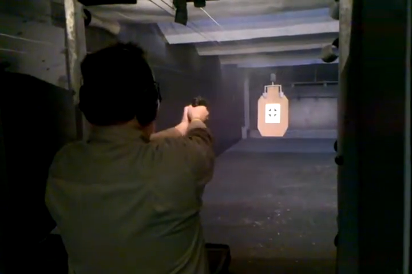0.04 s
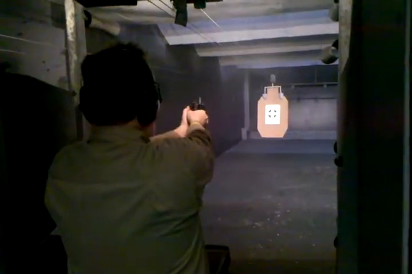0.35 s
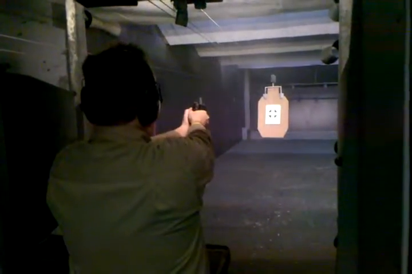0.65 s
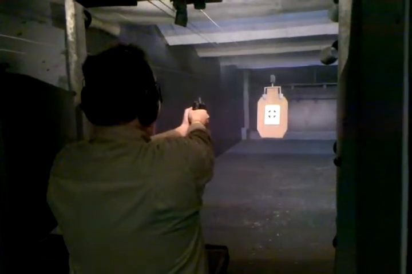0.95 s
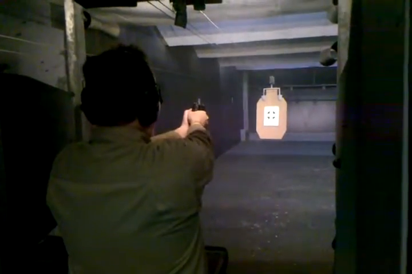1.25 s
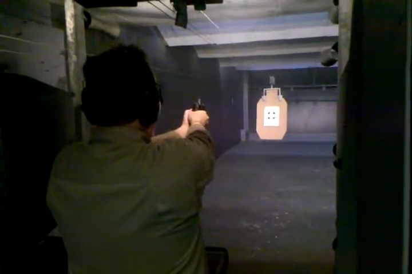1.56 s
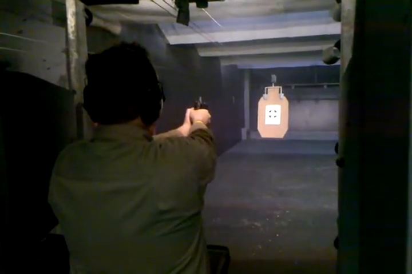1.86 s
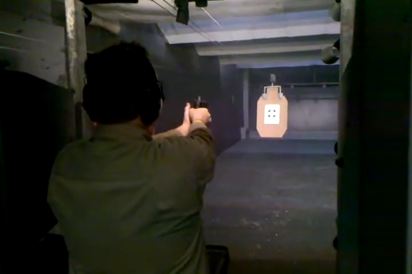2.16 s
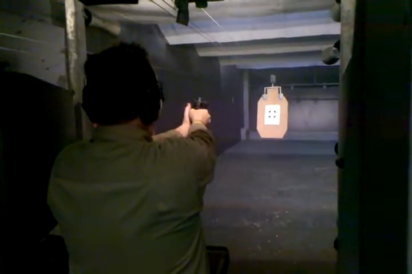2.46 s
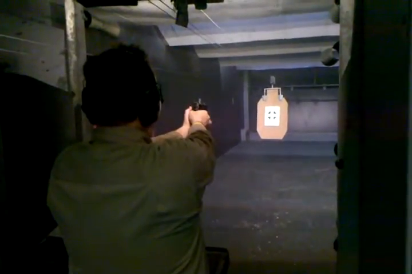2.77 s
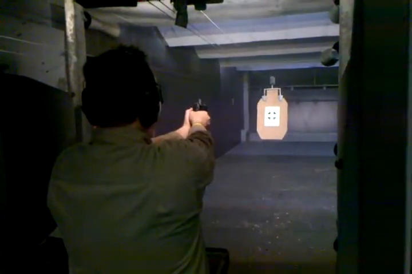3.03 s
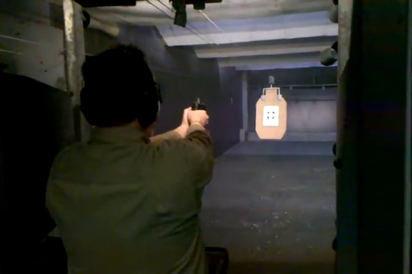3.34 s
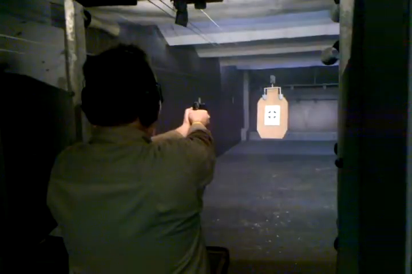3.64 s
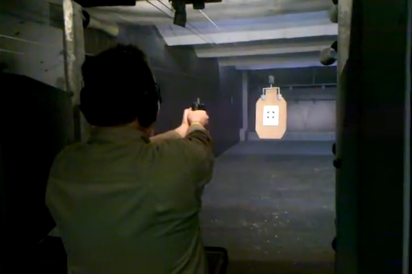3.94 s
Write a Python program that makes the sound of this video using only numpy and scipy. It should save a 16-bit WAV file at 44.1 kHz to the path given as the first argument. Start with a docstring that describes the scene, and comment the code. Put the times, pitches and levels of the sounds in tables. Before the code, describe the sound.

A single handgun blast rings out indoors, fading into faint casing pings and ventilation noise.

```python
"""One pistol shot in an indoor range, overloading a small camera microphone. The blast fills the concrete lane
and dies away in reflections, flutter echo and standing waves. The action clicks as the case is ejected; the
spent brass case bounces and pings. Ventilation hisses throughout. Two dry pops, the second faint, sound close
to the microphone as the echo fades."""
import sys
import numpy as np
from scipy import signal
from scipy.fft import rfft, irfft
from scipy.io import wavfile

SR = 44100
rng = np.random.default_rng(int(sys.argv[2]) if len(sys.argv) > 2 else 0)


def generate_wav(signal):
    """Clip the signal to [-1, 1] and save it as 16-bit WAV at the path in sys.argv[1]."""
    frames = np.transpose(np.atleast_2d(signal))
    scaled = np.clip(frames, -1, 1) * 32767
    pcm = np.round(scaled).astype(np.int16)
    wavfile.write(sys.argv[1], SR, pcm)


N = 176400
T = np.arange(N) / SR
HZ = np.fft.rfftfreq(N, 1 / SR)
PADDED_HZ = np.fft.rfftfreq(2 * N, 1 / SR)

# ventilation air: freq_hz, density_db
AIR_SPECTRUM = [(25, -108), (50, -98), (85, -80), (118, -68.5), (150, -67), (230, -70.5), (275, -71.5),
                (330, -67.5), (470, -73.5), (600, -73), (1100, -75), (1500, -77.5), (2000, -83),
                (2900, -89.5), (3900, -87), (5000, -93), (6700, -94.5)]
# duct resonances: pitch_hz, half_width_hz, rms_db
DUCT_MODES = [(117.6, 3.7, -52.5), (184.7, 6, -55), (232, 10, -48.5), (324.4, 6.3, -63), (514, 5.5, -57.5),
              (588.6, 2.3, -55), (612, 8.8, -57), (707.4, 8, -58), (784, 13, -57), (907, 8, -61),
              (996, 9.1, -58), (1152, 6.2, -60), (1468, 12, -59.5)]
# dry pops: start_s, level_db, rise_s, fall_s
DRY_POPS = [(1.2489, -10.5, .00002, 0.00081), (1.933, -30, .0002, 0.00024)]
# action click, then case bounces: start_s, level_db, bright_hz, spread_hz, room_t60_s
CLICKS_AND_BOUNCES = [(.314, -42, 7100, 2020, 0.26), (.597, -42.5, 5250, 1200, 0.4), (0.699, -55, 5400, 1000, 1),
                      (0.863, -50.5, 5430, 700, 0.4), (1.05, -53, 5150, 1000, .6), (1.14, -52, 4850, 1400, .8),
                      (1.166, -50, 4400, 1400, .8)]
# brass case modes: pitch_hz, gain_db, t60_s
BRASS_MODES = [(3900, -6, .2), (4600, -7, .25), (5066, 0.5, .22), (5432, -1.5, .26), (5750, -9.5, .25),
               (6600, -6.5, .15)]
# standing waves of the lane: pitch_hz, initial_rms_db, t60_s
LANE_MODES = [(221.1, -24.5, 1.02), (301, -19.5, 1.1), (324, -22.5, 0.89), (374.6, -17, 0.58),
              (699, -22.5, 2), (746, -20.5, 1.5), (777, -27, 2.9), (853, -25.5, 3.04), (877, -24, 1.1),
              (920, -31.5, 2.8), (920, -24, 1.5), (1017, -22.5, 1.1), (1151, -22.5, 0.51)]
# reverberation from far down the range: freq_hz, initial_density_db
FAR_SPECTRUM = [(100, -76), (300, -56.5), (480, -54.5), (650, -45), (850, -39.5), (1050, -46),
                (1270, -46.5), (1700, -56.5), (2050, -52.5), (2700, -68), (6000, -86.5)]
# blast in the lane: freq_hz, density_db
BLAST_SPECTRUM = [(30, -85), (85, -64), (130, -45.5), (230, -40.5), (320, -33), (430, -39), (570, -32),
                  (750, -32.5), (980, -31), (1300, -37), (1700, -42.5), (2100, -40.5), (2800, -51.5),
                  (3600, -52.5), (5000, -60.5), (6800, -68.5)]
# time that reflections hold the blast up: freq_hz, hold_s
BLAST_HOLD = [(150, 0.014), (400, 0.027), (800, 0.054), (2000, 0.015), (6000, .02)]
# blast decay: freq_hz, t60_s
BLAST_DECAY = [(60, 0.35), (130, 1.0), (300, 1.11), (800, 1.05), (2000, 1.064), (3500, 0.95), (6500, 0.41)]
# swells and dips as strong reflections return: time_s, gain_db
BLAST_SWELL = [(0, 0.5), (.05, 0), (.105, 0.5), (.15, -5.5), (.195, 1.5), (.26, -3), (.325, 0), (.42, -2)]
# dull top end, steep cut above 7 kHz with a very faint lobe near 9 kHz: freq_hz, gain_db
TREBLE_ROLLOFF = [(6700, -0.5), (7000, -6), (7400, -18), (7900, -36), (8250, -40.5), (8700, -24),
                  (9200, -20), (9700, -28), (10400, -51)]


def amp(db):
    """Decibels to gain."""
    return 10 ** (np.asarray(db) / 20)


def unit_rms(x):
    """Scales to an rms of one."""
    return x / np.sqrt(np.mean(x ** 2) + 1e-20)


def lookup(table, hz):
    """Interpolates a table on a log-frequency axis."""
    freq_hz, value = np.transpose(table)
    return np.interp(np.log(hz + 1), np.log(freq_hz + 1), value)


def decay(t, t60_s):
    """Gain falling 60 dB every t60_s."""
    return amp(-60 * t / t60_s)


def resonance(hz, centre_hz, half_width_hz):
    """Bell-shaped gain, one at the centre."""
    return 1 / (1 + ((hz - centre_hz) / half_width_hz) ** 2)


def mode(pitch_hz, t60_s):
    """Decaying sine, random phase."""
    return decay(T, t60_s) * np.sin(2 * np.pi * (pitch_hz * T + rng.random()))


def add(mix, start_s, sound):
    """Mixes a sound in at start_s."""
    part = mix[round(start_s * SR):][:len(sound)]
    part += sound[:len(part)]


def noise(gain):
    """Steady noise, gain per root Hz."""
    return irfft(rfft(rng.standard_normal(N)) * gain, N) * np.sqrt(SR / 2)


def ventilation(waver_db=0.84, waver_hz=2.6):
    """Rushing air with narrow duct resonances, wavering slightly."""
    ducts = sum(amp(rms_db) * unit_rms(noise(resonance(HZ, pitch_hz, half_width_hz)))
                for pitch_hz, half_width_hz, rms_db in DUCT_MODES)
    waver = unit_rms(noise(np.exp(-(HZ / waver_hz) ** 2)))
    air = noise(amp(lookup(AIR_SPECTRUM, HZ)))
    return (air + ducts) * amp(waver_db * waver)


def pops(low_cut_hz=135):
    """Sudden one-sided pushes, no room; the low cut adds a slow undershoot."""
    out = np.zeros(N)
    t = T[:SR // 10]
    low_cut = signal.butter(2, low_cut_hz, "high", fs=SR)
    for start_s, level_db, rise_s, fall_s in DRY_POPS:
        push = (1 - np.exp(-t / rise_s)) * np.exp(-t / fall_s)
        add(out, start_s, amp(level_db) * signal.lfilter(*low_cut, push / push.max()))
    return out


def spent_case(ring_gain=0.44, room_db=-3, rise_s=0.003):
    """The action clicks, then each bounce rings the brass; the room smears it into a short hiss."""
    out = np.zeros(N)
    attack = np.minimum(T / rise_s, 1)
    for start_s, level_db, bright_hz, spread_hz, room_t60_s in CLICKS_AND_BOUNCES:
        ring = sum(amp(gain_db) * resonance(pitch_hz, bright_hz, spread_hz) * mode(pitch_hz, t60_s)
                   for pitch_hz, gain_db, t60_s in BRASS_MODES)
        hiss = unit_rms(noise(resonance(HZ, bright_hz, spread_hz) ** 2))
        room = amp(room_db) * decay(T, room_t60_s) * hiss
        add(out, start_s, amp(level_db) * attack * (ring_gain * ring + room))
    return out


def reflections(gain_at, size=512):
    """Dense random reflections: noise shaped by gain_at(hz, t)."""
    frames = dict(fs=SR, nperseg=size, noverlap=size - size // 4)
    hz, t, spectra = signal.stft(rng.standard_normal(N + 2 * size), **frames)
    spectra *= gain_at(hz[:, None], np.maximum(t - size / SR, 0))
    _, shaped = signal.istft(spectra, **frames)
    return shaped[size:size + N] * np.sqrt(SR / 2)


def flutter_echo(x, repeat_hz=65.03, feedback=0.24, top_hz=1600):
    """Sound bouncing between floor and ceiling rings at multiples of the repeat rate."""
    returned = feedback / (1 + (PADDED_HZ / top_hz) ** 4)
    round_trip = np.exp(-2j * np.pi * PADDED_HZ / repeat_hz)
    comb = np.sqrt(1 - returned ** 2) / (1 - returned * round_trip)
    return irfft(rfft(x, 2 * N) * comb)[:N]


def blast_gain(hz, t, swell_top_hz=1600):
    """The blast holds briefly, then dies, mids last; returning reflections swell its body."""
    swell_db = np.interp(t, *np.transpose(BLAST_SWELL)) / (1 + (hz / swell_top_hz) ** 4)
    decaying_s = np.maximum(t - lookup(BLAST_HOLD, hz), 0)
    return amp(lookup(BLAST_SPECTRUM, hz) + swell_db) * decay(decaying_s, lookup(BLAST_DECAY, hz))


def pistol_shot(low_cut_hz=108, far_t60_s=2.4):
    """The blast excites near reflections, a long hollow tail and standing waves."""
    low_cut = signal.butter(4, low_cut_hz, "high", fs=SR, output="sos")
    near = signal.sosfilt(low_cut, reflections(blast_gain))
    far = reflections(lambda hz, t: amp(lookup(FAR_SPECTRUM, hz)) * decay(t, far_t60_s))
    standing_waves = sum(np.sqrt(2) * amp(rms_db) * mode(pitch_hz, t60_s)
                         for pitch_hz, rms_db, t60_s in LANE_MODES)
    return flutter_echo(near + far) + standing_waves


def scene():
    """Mono sum at the microphone."""
    return (pistol_shot() + spent_case() + pops() + ventilation())[None]


def record(dry):
    """Dulled treble, overload on the blast, band limit."""
    knee_sharpness, band_limit_hz = 13, 17100
    dulled = irfft(rfft(dry, 2 * N) * amp(lookup(TREBLE_ROLLOFF, PADDED_HZ)))[:, :N]
    clipped = dulled / (1 + abs(dulled) ** knee_sharpness) ** (1 / knee_sharpness)
    low_pass = signal.firwin(255, band_limit_hz, window=("kaiser", 9), fs=SR)
    return signal.oaconvolve(clipped, low_pass[None], "same")


dry = scene()
out = record(dry)
generate_wav(out)
```